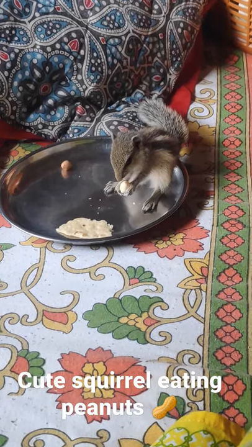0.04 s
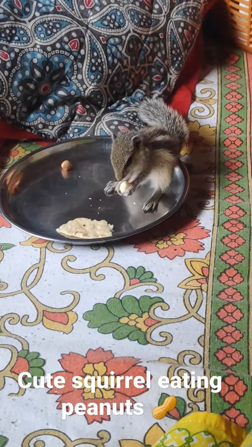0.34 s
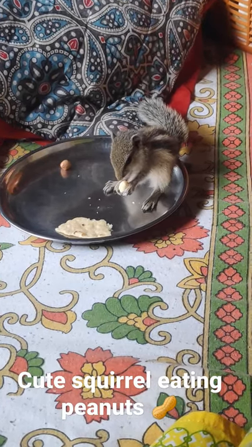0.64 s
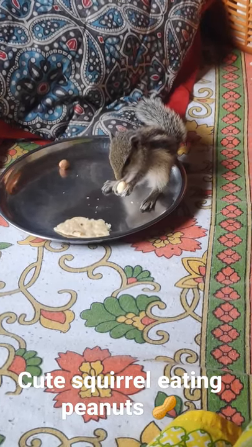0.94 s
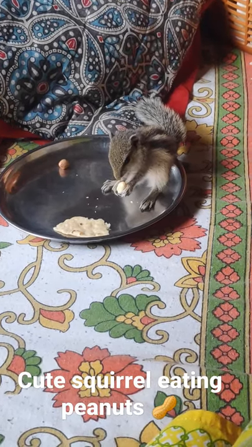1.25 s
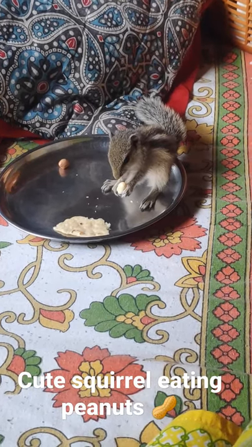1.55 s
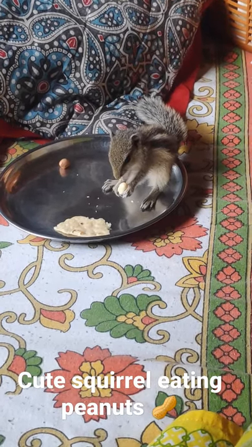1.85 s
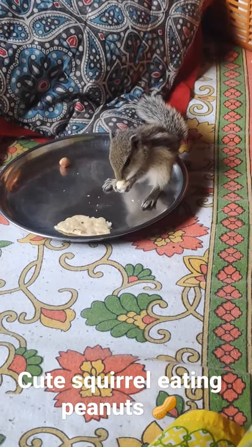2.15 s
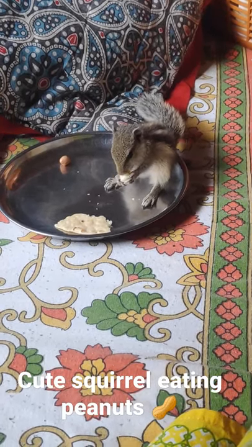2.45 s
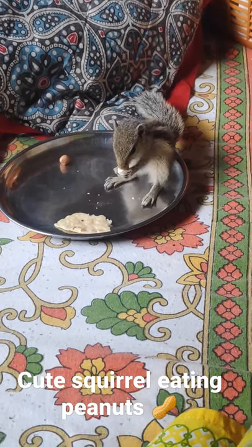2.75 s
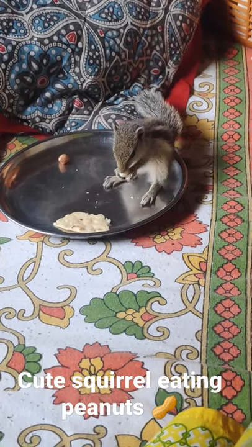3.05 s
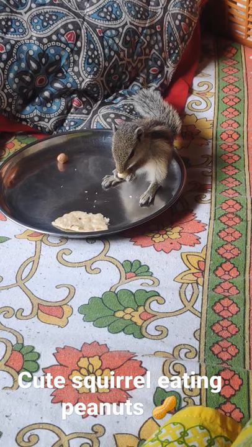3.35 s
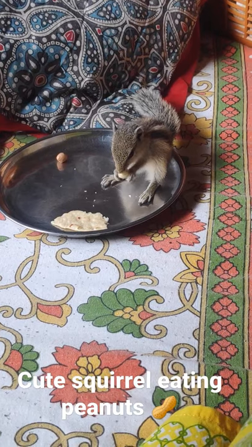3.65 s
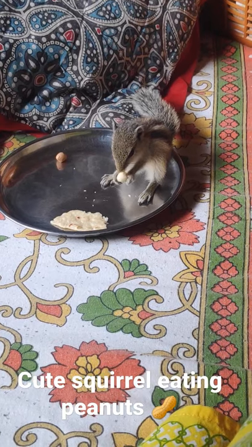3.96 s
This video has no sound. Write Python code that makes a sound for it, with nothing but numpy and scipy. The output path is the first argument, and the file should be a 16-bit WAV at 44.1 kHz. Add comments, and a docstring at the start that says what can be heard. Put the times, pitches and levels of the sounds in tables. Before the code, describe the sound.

A nearby bird repeats high chirps, many ending in a falling rasp, while a squirrel nibbles a peanut with small dry cracks and ticks. Fainter birds call farther off over a steady hiss in a softly echoing room.

```python
"""Indoors, in a softly ringing room, a small squirrel nibbles a peanut on a steel plate.
The nut breaks with dry cracks, and the teeth make tiny ticks in between. A bird chirps over it,
taking turns between a quavering whistle and a purer one, most followed by a falling rasp.
Other birds call farther off, one repeating a rising note. Under it all lie a steady hiss of air,
two low bumps and one knock on the microphone's housing."""
import sys
import numpy as np
from scipy import signal
from scipy.io import wavfile

SR = 44100
rng = np.random.default_rng(int(sys.argv[2]) if len(sys.argv) > 2 else 0)


def dump_mix(stems):
    """Bounce the given channels to the path in sys.argv[1] as a 16-bit WAV at rate SR."""
    frames = np.atleast_2d(stems).T  # one column per channel
    limited = np.clip(frames, -1, 1)  # hard clip at full scale
    pcm = np.round(limited * 32767).astype(np.int16)
    wavfile.write(sys.argv[1], SR, pcm)


N = 176400  # 4 seconds

# How strong the background air is from low to high: pitch_hz, relative_db
HISS_SHAPE = [(22, -4.5), (30, -1), (45, -7), (62, -8), (85, -13.5), (140, -19.5), (190, -21.5), (250, -19),
              (400, -22), (650, -20.5), (1000, -15), (1500, -19), (2000, -19), (2600, -23.5), (3500, -22.5),
              (5300, -19.5), (6500, -27.5), (8000, -27.5), (10000, -29), (13000, -45), (15500, -46)]
# How alike the hiss is in the two ears (1 is the same): pitch_hz, likeness
HISS_LIKENESS = [(30, 0.59), (85, 0.68), (170, 0.56), (350, .6), (700, 0.72), (1400, 0.36), (2800, 0.54),
                 (5600, .28), (11000, 0.12)]
# Which side the hiss leans to: pitch_hz, left_minus_right_db
HISS_SIDES = [(30, 4), (85, 4.5), (170, 4), (350, 3.5), (700, 4.5), (1400, -1), (2800, 0), (5600, 1),
              (13000, -2)]
# Calls of far birds: start_s, length_s, start_hz, end_hz, relative_db
FAR_BIRD_CALLS = [(-.02, 0.062, 3250, 3134, -37.5), (-.01, 0.052, 1060, 1020, -38),
                  (.17, 0.1, 2940, 2680, -41), (.27, 0.094, 2830, 3400, -42.5), (.88, .04, 1304, 1707, -36),
                  (1.267, 0.043, 1186, 1530, -38), (1.59, 0.11, 3020, 2950, -38.5),
                  (1.69, 0.14, 2510, 2457, -37.5), (1.81, 0.14, 2500, 2442, -37.5),
                  (1.991, 0.11, 4390, 4450, -34), (2.154, .13, 2880, 2995, -40.5),
                  (2.555, .035, 1310, 1726, -37), (2.70, 0.091, 3030, 3140, -45),
                  (2.738, 0.048, 1201, 1404, -39), (2.79, 0.097, 3156, 3200, -39.5),
                  (2.952, 0.036, 1306, 1630, -36), (3.39, 0.23, 2580, 2563, -40),
                  (3.56, 0.22, 3183, 3125, -38.5), (3.745, .045, 1390, 1246, -38.5),
                  (3.86, 0.091, 1990, 1556, -31.5)]
# The near bird's whistles: start_s, length_s, pitch_hz, glide_hz, level_db, quaver (0 to 1), room_db
WHISTLE_NOTES = [(0.038, 0.054, 4070, -34, -33, 0.5, -32), (0.353, 0.067, 4075, -45, -33.5, 0.2, -31),
                 (0.669, 0.095, 4060, -67, -30.5, 0.45, -33.5),
                 (1.018, 0.062, 3903, 60, -19.5, 0.83, -23.5), (1.354, 0.073, 3982, -47, -15.5, 0.4, -21),
                 (1.596, 0.068, 3888, 48, -17, 1, -24), (1.928, 0.064, 3956, -33, -15, 0.37, -18.5),
                 (2.17, 0.07, 3914, 111, -16, 1, -23.5), (2.491, 0.0792, 3968, -56, -12, 0, -21),
                 (2.733, 0.068, 3922, 64, -13.5, 1, -21.5), (2.933, 0.093, 4058, -27, -29.5, .2, -28.5),
                 (3.055, 0.074, 3958, -75, -14, 0, -17), (3.3, 0.074, 3861, 49, -18, 1, -20.5),
                 (3.626, 0.091, 3937, -12, -15, 0.28, -20), (3.865, 0.071, 3902, 74, -14.5, 1, -22)]
# The near bird's falling rasps: start_s, length_s, start_hz, end_hz, relative_db
RASP_NOTES = [(0.084, .06, 5340, 5000, -35), (0.432, 0.061, 5540, 4970, -36), (0.797, .04, 5650, 5150, -38),
              (1.120, 0.049, 5300, 4620, -28.5), (1.454, 0.058, 5640, 5170, -35.5),
              (1.691, .055, 5300, 4670, -27), (2.268, 0.069, 5356, 4660, -26),
              (2.828, .064, 5386, 4590, -27.5), (3.062, 0.0607, 5530, 5200, -36),
              (3.399, 0.057, 5470, 4590, -26.5), (3.734, 0.048, 5530, 5080, -40),
              (3.966, 0.045, 5380, 4660, -24.5)]
# Soft thuds: start_s, length_s, top_hz, relative_db
LOW_BUMPS = [(.343, .035, 850, -38), (1.445, .15, 75, -28)]
# Bites that crack the nut: start_s, ring_hz, ring_db, snap_db
NUT_BITES = [(.3454, 5300, -14.5, -29), (0.529, 5300, -17, -41), (0.6537, 12300, -24.5, -24),
             (.7361, 6350, -24, -27), (0.754, 12100, -23, -36), (.8822, 11600, -32, -35),
             (.887, 3120, -22, -29), (1.2835, 6000, -12, -36), (1.2927, 5870, -15, -30),
             (1.3134, 7700, -24, -29), (1.3377, 5100, -13, -24), (1.443, 5680, -10, -19),
             (1.4429, 10100, -12.5, -43), (1.5498, 5050, -2.5, -23), (1.549, 2760, -5, -16),
             (1.823, 5700, -26, -24), (1.832, 7040, -20, -32), (1.842, 6360, -19, -26),
             (1.9038, 5600, -0.5, -18), (1.9036, 3130, -5, -32), (1.949, 5760, -7, -24),
             (1.9895, 6600, -32, -19), (2.0273, 13700, -30, -31), (2.126, 5430, -14, -29),
             (2.1254, 2150, -13, -28), (2.1359, 6550, -22, -28), (2.150, 12800, -22, -38),
             (2.2037, 7700, -24, -16.5), (2.2221, 6940, -16, -19), (2.6397, 5230, -18, -21.5),
             (2.657, 5600, -7, -15.5), (2.6571, 3570, -7, -32), (2.6637, 5350, -9, -24),
             (2.7355, 5600, -30, -26), (2.7825, 11600, -17.5, -25), (3.0052, 12000, -20.5, -31),
             (3.2378, 5600, -28, -21), (3.2861, 13000, -29, -39), (3.319, 13500, -21.5, -38),
             (3.3434, 12000, -24, -44), (3.625, 5900, -14, -13.5), (3.7459, 8000, -34, -27),
             (3.7985, 4660, -10.5, -49), (3.883, 13100, -30, -37), (3.9127, 12300, -24, -35),
             (3.9835, 5170, -9, -29)]
# Tones the microphone's housing rings with when knocked: pitch_hz, level_db, fade_s
HOUSING_TONES = [(27, -15, 0.28), (75, -7, 0.041), (170, -19, 0.013)]

# A fade time is how long a sound takes to drop by 60 dB. A pan above zero leans left.
ROOM_FADE_S, ROOM_DELAY_S, ROOM_BUILD_S = 1, 0.011, 0.0078
HISS_DB, HISS_FLICKER_DB = -35.5, 1.2
RING_FADE_S, SNAP_FADE_S, CRUMBLE_FADE_S = 0.0037, 0.0042, 0.04
TICKS_PER_S, QUIETEST_TICK_DB, TICK_SPREAD_DB = 35, -42, 4
SQUIRREL_PAN_DB, SQUIRREL_ROOM_DB = 8.5, -10.5
QUAVER_HZ, PURE_RELEASE_S, QUAVER_RELEASE_S = 231, 0.024, 0.008
BUZZ_S, BUZZ_DB = 0.028, -13
RASP_FLUTTER_HZ = 310
PIPE_START_S, PIPE_EVERY_S, PIPE_NOTES = 0.645, 0.2658, 9
PIPE_LENGTH_S, PIPE_HZ, PIPE_RISE_HZ = 0.085, 1890, 270


def from_db(db):
    """Turn decibels into a number to multiply a sound by."""
    return 10 ** (np.asarray(db) / 20)


def rms_one(x):
    """Scale a sound so its average strength (rms) is 1."""
    return x / np.sqrt(np.mean(x ** 2) + 1e-20)


def at_hz(points, hz):
    """Read between the rows of a table, giving every octave equal room."""
    pitches, values = np.array(points).T
    return np.interp(np.log(hz), np.log(pitches), values)


def clock(length):
    """The time in seconds of each sample of one sound."""
    return np.arange(int(length * SR)) / SR


def wander(t, rate):
    """A random drift, about 1 in size, that heads for a new value `rate` times a second."""
    return np.interp(t * rate, np.arange(2048), rng.standard_normal(2048))


def band(x, low, high):
    """Keep the part of a sound between two frequencies in Hz."""
    edges = [low, min(high, SR / 2 - 100)]
    return signal.sosfilt(signal.butter(2, edges, "band", fs=SR, output="sos"), x)


def tone(hz):
    """A pure tone that follows a changing pitch."""
    return np.sin(2 * np.pi * np.cumsum(hz) / SR)


def swell(t, length, attack, release):
    """A loudness curve that rises smoothly, holds and falls."""
    rise = np.sin(np.pi / 2 * np.clip(t / attack, 0, 1))
    fall = np.sin(np.pi / 2 * np.clip((length - t) / release, 0, 1))
    return rise * fall


def add(track, start_s, sound):
    """Mix a sound into a track, dropping whatever falls outside it."""
    i = int(start_s * SR)
    sound, i = sound[max(-i, 0):], max(i, 0)
    track[i:i + len(sound)] += sound[:max(N - i, 0)]


def pan(x, db):
    """Place a sound by making the left side `db` louder than the right."""
    return x * from_db([[db / 2], [-db / 2]])


def room(x):
    """A blur of echoes that builds up and dies away, different at each ear."""
    t = clock(1.2)
    build = 1 - np.exp(-np.maximum(t - ROOM_DELAY_S, 0) / ROOM_BUILD_S)
    tail = rng.standard_normal((2, len(t))) * from_db(-60 * t / ROOM_FADE_S) * build
    return signal.fftconvolve(x[None], rms_one(tail) / np.sqrt(len(t)), axes=1)[:, :N]


def hiss():
    """Steady background air: half-octave bands of noise, each flickering a little."""
    out, t = 0, np.arange(N) / SR
    edges = 18 * 2 ** np.arange(0, 10.1, .5)
    white = rng.standard_normal((2, 2, N))
    for k, (low, high) in enumerate(zip(edges, edges[1:])):
        shared, side = band(white[k % 2], low, high)
        hz = np.sqrt(low * high)
        alike = at_hz(HISS_LIKENESS, hz)
        both_ears = shared + np.sqrt((1 - alike) / (1 + alike)) * side * [[1], [-1]]
        gain = from_db(at_hz(HISS_SHAPE, hz) + HISS_FLICKER_DB * wander(t, 14))
        out = out + gain * pan(both_ears, at_hz(HISS_SIDES, hz))
    return from_db(HISS_DB) * rms_one(out)


def far_birds():
    """Thin, wavering whistles from far off, with a little more echo than direct sound."""
    out = np.zeros(N)
    for start, length, start_hz, end_hz, db in FAR_BIRD_CALLS:
        t = clock(length)
        pitch = start_hz + (end_hz - start_hz) * t / length + 64.8 * wander(t, 134.7)
        add(out, start, from_db(db) * swell(t, length, 0.018, 0.011) * tone(pitch))
    return from_db(-1.5) * out + from_db(-1) * room(out)


def crack(hz, ring_db, snap_db):
    """The nut breaks: a very short ring, a noisy snap and a trace of crumbling."""
    t = clock(.03)
    snap, crumbs = band(rng.standard_normal((2, len(t))), 2140, 9700)
    ring = np.sin(2 * np.pi * hz * t) * from_db(-60 * t / RING_FADE_S) * (1 - np.exp(-t * hz))
    crumble = rms_one(band(crumbs, hz * 0.59, hz * 1.17)) * from_db(-21.5 - 60 * t / CRUMBLE_FADE_S)
    snap = rms_one(snap) * from_db(-0.5 - 60 * t / SNAP_FADE_S)
    return from_db(ring_db) * (ring + crumble) + from_db(snap_db) * snap


def tooth_ticks():
    """The squirrel's teeth make tiny cracks in the nut at random moments."""
    out = np.zeros(N)
    starts = np.cumsum(rng.exponential(1 / TICKS_PER_S, 300))
    for start in starts[starts < N / SR]:
        db = QUIETEST_TICK_DB + TICK_SPREAD_DB * min(rng.exponential(), 3)
        add(out, start, crack(rng.uniform(5000, 14000), db, db - 1))
    return out


def whistles():
    """Nearly pure notes that swell and fade; rising ones quaver most and end in a short, weaker buzz."""
    direct, to_room = np.zeros((2, N))
    for start, length, hz, glide_hz, db, quaver, room_db in WHISTLE_NOTES:
        t = clock(length + BUZZ_S)
        progress = np.minimum(t / length, 1)
        slide = glide_hz * (progress - .5) * (t < length)
        shake = quaver * tone(QUAVER_HZ * (1 + 0.058 * wander(t, 98)))
        depth = 50 * progress + 190 * progress ** 12  # the shake widens sharply into the buzz
        jitter = (8 + 30 * quaver * progress) * wander(t, 602)
        tremble = 1 + 0.26 * shake + 0.25 * quaver * wander(t, 164)
        voice = tremble * tone(hz + slide + depth * shake + jitter)
        release = np.interp(quaver, [0, 1], [PURE_RELEASE_S, QUAVER_RELEASE_S])
        body = swell(t, length, length / 2, release) ** 0.86
        buzz = quaver * from_db(BUZZ_DB) * swell(t, length + BUZZ_S, 0.004, 0.004)
        add(direct, start, from_db(db) * np.maximum(body, buzz) * voice)
        add(to_room, start, from_db(room_db) * np.maximum(body, 3.9 * buzz) * voice)
    return pan(direct, db=4.2) + room(to_room)


def rasps():
    """Falling notes torn up by a wide, uneven flutter; the bigger the fall, the harsher."""
    out = np.zeros(N)
    biggest_fall = max(start_hz - end_hz for _, _, start_hz, end_hz, _ in RASP_NOTES)
    for start, length, start_hz, end_hz, db in RASP_NOTES:
        t = clock(length)
        fall_hz = start_hz - end_hz
        swing = 324 * tone(RASP_FLUTTER_HZ * (1 + 0.23 * wander(t, 192)))
        jitter = 224 * wander(t, 1511)
        pitch = start_hz - fall_hz * t / length + (swing + jitter) * np.sqrt(fall_hz / biggest_fall)
        level = swell(t, length, attack=0.015, release=0.01) * (1 + 0.39 * wander(t, 687))
        add(out, start, from_db(db) * level * tone(pitch))
    return from_db(1.5) * (pan(out, db=3.5) + room(out))


def bumps():
    """Soft thuds made of low noise, different at each ear."""
    out = np.zeros((2, N))
    for start, length, top_hz, db in LOW_BUMPS:
        t = clock(length)
        level = from_db(db - 1) * swell(t, length, attack=0.0042, release=length * 1.26)
        for ear in out:
            rumble = band(rng.standard_normal(SR), top_hz / 3, top_hz)[-len(t):]
            add(ear, start, level * rms_one(rumble))
    return out


def bites():
    """Each clear bite cracks the nut once."""
    out = np.zeros(N)
    for start, ring_hz, ring_db, snap_db in NUT_BITES:
        add(out, start, crack(ring_hz, ring_db, snap_db))
    return out


def piping_bird():
    """A far bird off to one side repeats a rising note; its wave is upside down at the right ear."""
    out, t = np.zeros(N), clock(PIPE_LENGTH_S)
    pitch = PIPE_HZ + PIPE_RISE_HZ * t / PIPE_LENGTH_S
    note = from_db(-38) * swell(t, PIPE_LENGTH_S, .05, .025) * tone(pitch)
    for k in range(PIPE_NOTES):
        strength = min(1, .4 + .3 * k)  # the first two notes are softer
        add(out, PIPE_START_S + k * PIPE_EVERY_S, strength * note)
    return np.array([out, -from_db(-3) * out]) + from_db(-12) * room(out)


def knock():
    """A knock makes the housing ring and pushes its two microphones opposite ways."""
    out, t = np.zeros(N), clock(.3)
    ring = sum(from_db(db - 60 * t / fade_s) * np.sin(2 * np.pi * hz * t)
               for hz, db, fade_s in HOUSING_TONES)
    add(out, start_s=3.547, sound=ring * swell(t, .3, 0.0027, .05))
    return np.array([out, -from_db(-5) * out])


def scene():
    """Air, birds, thuds and the nibbling squirrel together, in stereo."""
    around = hiss() + far_birds() + whistles() + rasps() + bumps() + piping_bird() + knock()
    nibbling = tooth_ticks() + bites()
    return around + pan(nibbling, SQUIRREL_PAN_DB) + from_db(SQUIRREL_ROOM_DB) * room(nibbling)


def record(dry):
    """Cut away the highest treble, steeply above 15700 Hz."""
    return signal.sosfilt(signal.ellip(10, .1, 80, 15700, fs=SR, output="sos"), dry)


dry = scene()
out = record(dry)
dump_mix(out)
```